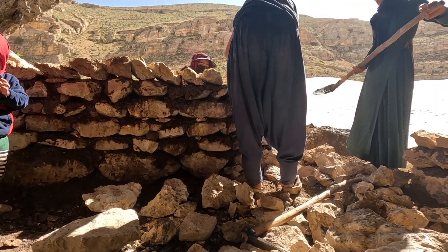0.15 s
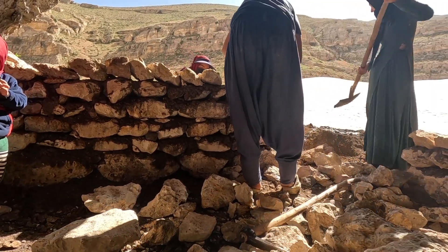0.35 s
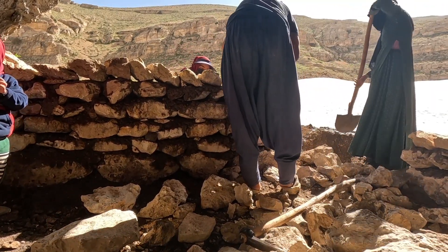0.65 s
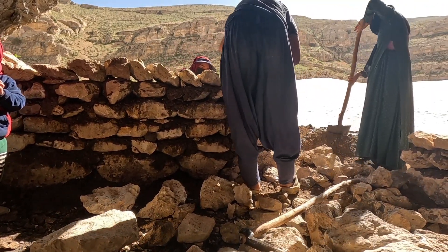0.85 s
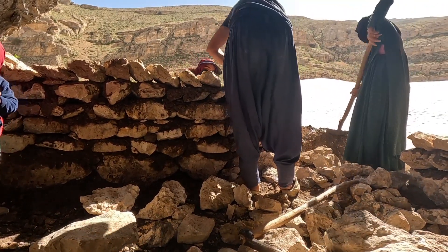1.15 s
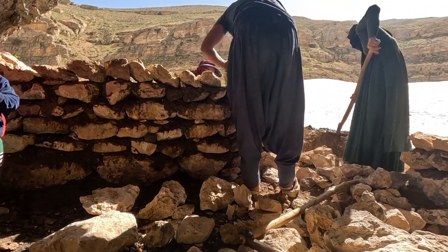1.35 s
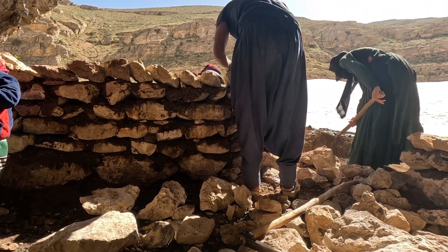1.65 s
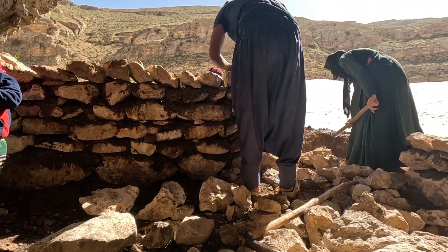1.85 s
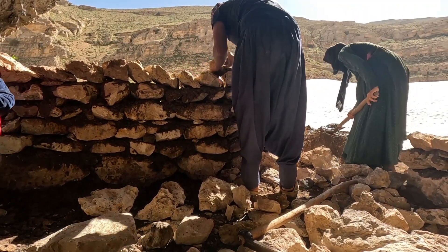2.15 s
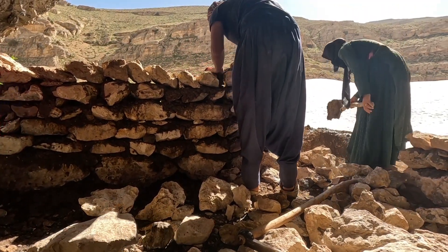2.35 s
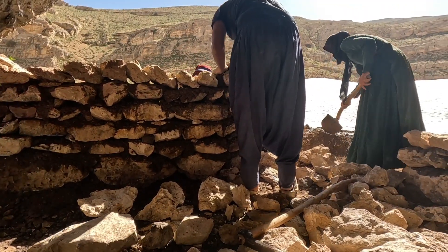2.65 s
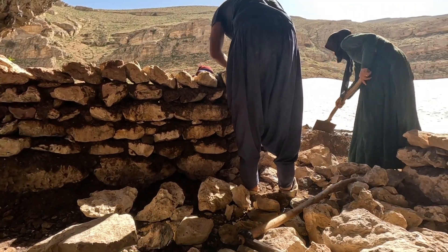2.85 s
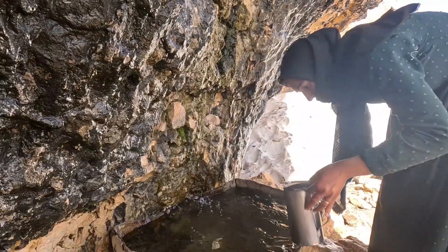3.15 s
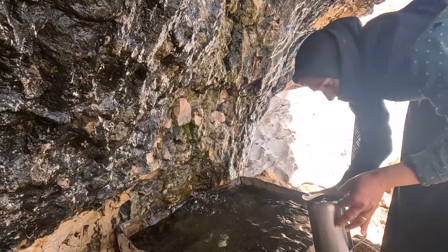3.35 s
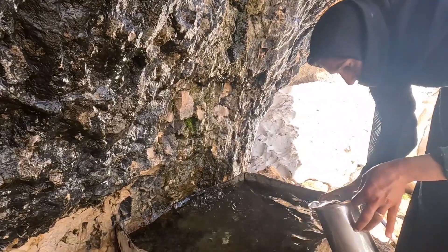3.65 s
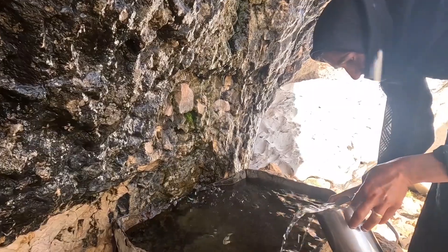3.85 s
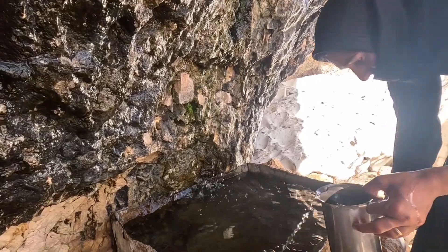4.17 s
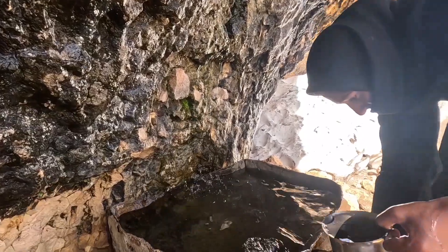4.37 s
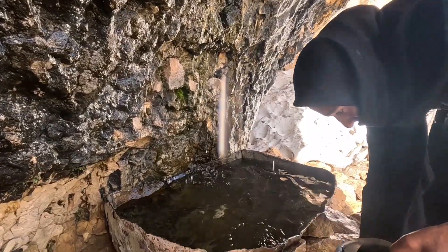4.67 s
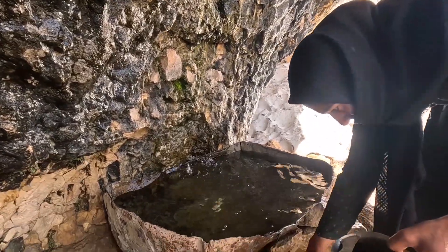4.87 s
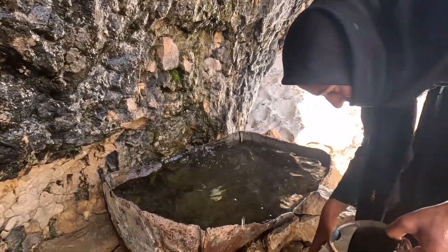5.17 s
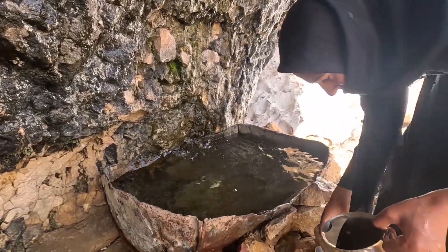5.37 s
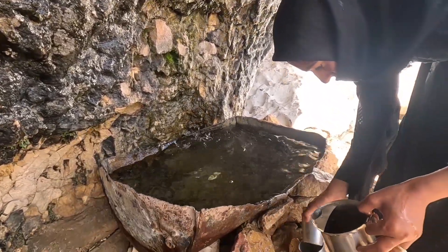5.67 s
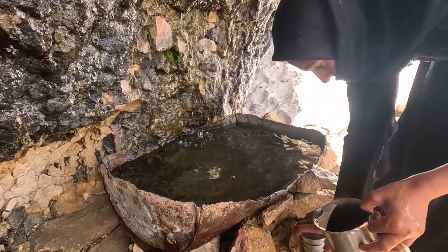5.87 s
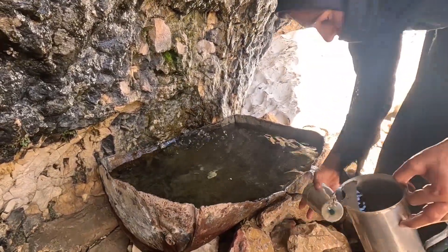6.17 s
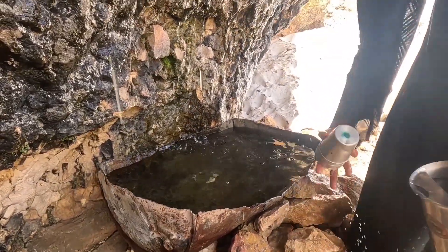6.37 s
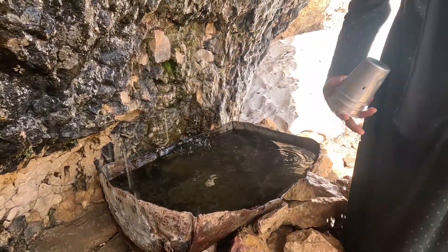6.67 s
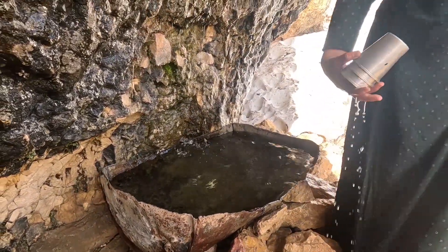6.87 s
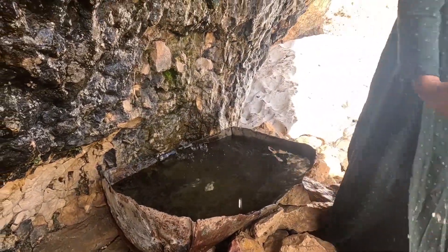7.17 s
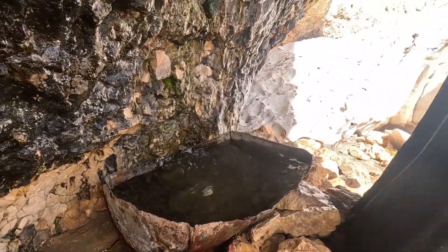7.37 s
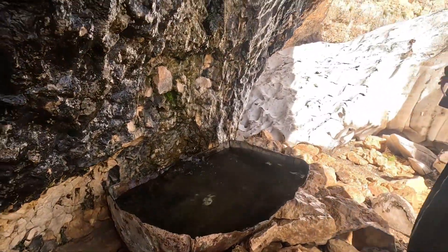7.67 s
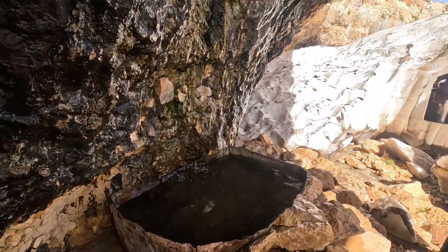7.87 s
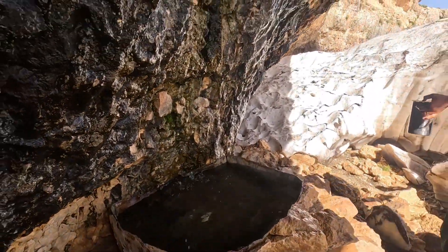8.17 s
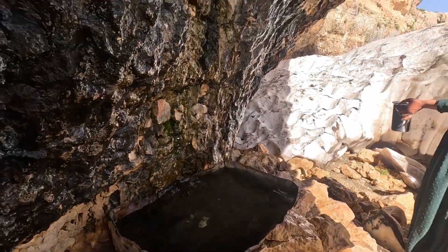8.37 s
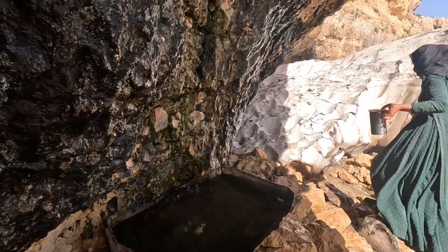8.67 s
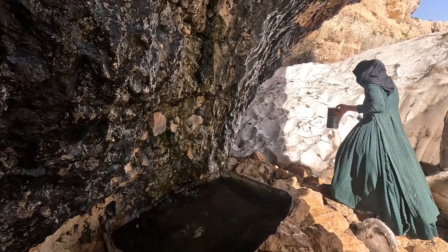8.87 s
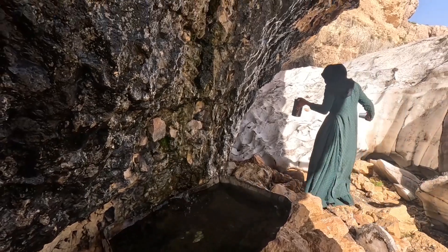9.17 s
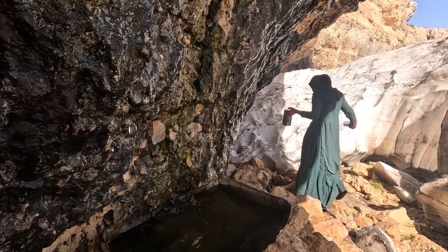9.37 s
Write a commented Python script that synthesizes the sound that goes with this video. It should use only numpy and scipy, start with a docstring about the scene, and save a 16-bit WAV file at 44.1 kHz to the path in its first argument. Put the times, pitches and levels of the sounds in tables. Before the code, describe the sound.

Outdoor handheld sound in two parts. First, gritty shovel bites, a short scrape and boomy loose soil over faint rustle and wind puffs, ending in two loud crunches. Then a sudden change to close, crisp water pouring and dribbling into a full trough, with bubbles. Metal vessels knock, rasp and clink in the middle, with short dull rings; afterwards only trickle, sharp splats and rising bubble blips remain, with close stone reflections.

```python
"""Shovel on a hillside, then water and steel in a rock nook

First a dry hillside: a shovel scrapes and crunches in stony soil (filtered noise under level curves)
while a breeze buffets the microphone (low resonances driven by lumpy noise).
Then a rock nook: melt water dribbles into a tin trough (shaped noise), splats on the rim (decaying pings)
and traps bubbles (gliding sines), while a steel jug is set down on stone and a steel cup clinks
against it (rattles exciting damped modes)."""
import sys
import numpy as np
from scipy import signal
from scipy.fft import rfft, irfft, next_fast_len
from scipy.io import wavfile
from scipy.ndimage import uniform_filter1d, map_coordinates

SR = 44100
rng = np.random.default_rng(int(sys.argv[2]) if len(sys.argv) > 2 else 0)


def log_audio(samples):
    """Write samples as a 16-bit WAV file to the path given in sys.argv[1]."""
    # one column per channel
    frames = np.atleast_2d(samples).T
    # limit to full scale, then quantise
    limited = np.clip(frames, -1, 1)
    pcm = np.round(limited * 32767).astype(np.int16)
    wavfile.write(sys.argv[1], SR, pcm)


N = 420273

# flow of the melt water: (time [s], trickle level [dB], gurgle level [dB])
FLOW = [(2.96, -51, -47.5), (4.2, -46, -38), (4.8, -49.5, -38.5), (5.8, -49, -34), (6.4, -49.5, -36.5),
        (6.6, -54.5, -74), (7.0, -49.5, -42), (9.53, -50.5, -46)]
NOOK_START_S = FLOW[0][0]  # the hillside ends and the water begins


def amp(db):
    """Level definition: decibels to an amplitude gain."""
    return 10 ** (np.asarray(db) / 20)


def unit(x):
    """Power normalisation: scales to rms 1."""
    return x / np.sqrt(np.mean(x ** 2) + 1e-20)


def peak(rows):
    """Peak normalisation: scales each row to a largest magnitude of 1."""
    return rows / abs(rows).max(axis=-1, keepdims=True)


def along(points, hz):
    """Interpolates (frequency [Hz], value) points on a logarithmic frequency axis."""
    f, v = np.transpose(points)
    return np.interp(np.log(hz + 1), np.log(f + 1), v)


def curves(rows):
    """Level envelopes: each column after the time, per sample; -150 dB outside the table."""
    s, *cols = np.transpose(rows)
    return [np.interp(np.arange(N) / SR, s, c, -150, -150) for c in cols]


def wobble(rate):
    """Slow random modulation: a spline through normal random knots, rate of them a second."""
    knots = rng.standard_normal(int(N * rate / SR) + 4)
    return map_coordinates(knots, [np.arange(N) * rate / SR])


def patchy(depth_db):
    """Non-stationary noise: random louder and softer patches in time and frequency."""
    z = signal.stft(rng.standard_normal(N), nperseg=256)[2]
    field = rng.standard_normal(z.shape)
    field = uniform_filter1d(field, size=8, axis=0)
    field = uniform_filter1d(field, size=6, axis=1)
    return signal.istft(z * amp(depth_db * unit(field)), nperseg=256)[1][:N]


def filtered(x, response):
    """Linear filtering: the spectrum of x times a complex response of frequency."""
    m = next_fast_len(N + SR // 2)
    return irfft(rfft(x, m) * response(np.fft.rfftfreq(m, 1 / SR)), m)[..., :N]


def modes(table):
    """Resonance: a sum of causal second-order band-passes (centre [Hz], width [Hz], level [dB])."""
    def response(f):
        total = 0
        for k, (centre, width, db) in enumerate(table):
            damping = 1j * f * width
            # neighbours alternate in sign
            total = total + (-1) ** k * amp(db) * damping / (centre * centre - f * f + damping)
        return total
    return response


def place(s, rows):
    """Superposition: sums rows of samples, each starting at its time s."""
    start = np.round(np.asarray(s) * SR).astype(int)[:, None]
    at = start + np.arange(rows.shape[1])
    return np.bincount(at.ravel(), rows.ravel(), N + SR)[:N]


def rocks(x, t60=0.029):
    """Early reflections: convolution with a short decaying noise tail, echoes off nearby stone."""
    t = np.arange(SR // 8) / SR
    tail = amp(-60 * t / t60) * rng.standard_normal(len(t)) * (t > .002)
    return signal.fftconvolve(x, tail / np.linalg.norm(tail))[:N]


def breeze():
    """Wind buffeting: lumpy noise drives low resonances in puffs, with a higher boom in the nook."""
    # puffs on the microphone: (middle [s], full width at half amplitude [s], level [dB])
    puffs = [(0.47, 0.099, -43), (1.3, 0.62, -48.5), (2.643, 0.051, -45), (2.994, 0.11, -59.5),
             (4.377, 0.24, -51.5), (5.995, 0.24, -56), (7.927, 0.095, -51), (8.082, 0.072, -48.5)]
    calm_db = -73  # buffeting between puffs
    t = np.arange(N) / SR
    strength = amp(calm_db)
    for middle, length, db in puffs:
        strength = strength + amp(db) / (1 + (2 * (t - middle) / length) ** 4)
    lumps = unit(amp(7 * wobble(11)) * rng.standard_normal(N))
    rumble = unit(filtered(lumps, modes([(24.7, 14.0, 3.0), (63.0, 10, -1)])))
    boom = unit(filtered(lumps, modes([(62.0, 3.4, -2.0), (164.0, 36, -4)])))
    return strength * (rumble + amp(5.0) * boom * (t > NOOK_START_S))


def trickle():
    """Broadband flow noise: the fine, unresolved fizz of the stream, coming in surges."""
    # fizz spectrum: (frequency [Hz], spectral density [dB])
    spectrum = [(65, -82), (110, -24), (166, 0), (750, -5.5), (1200, 2.5), (2510, 8), (7670, -1),
                (13400, -22.5)]
    fizz = unit(filtered(patchy(depth_db=5.5), lambda hz: amp(along(spectrum, hz))))
    return amp(curves(FLOW)[0] + 2.5 * wobble(16)) * fizz


def shovel():
    """Granular friction: grit rubs in clumps, a crunch loads it briefly, and loose soil booms."""
    # one long drag of the blade: (time [s], grit level [dB], hollow soil level [dB])
    scrape = [(1.39, -57.5, -75), (1.46, -43, -51), (1.58, -56.5, -48.5), (1.94, -58, -42),
              (2.05, -83, -62), (2.2, -101, -59), (2.4, -66, -84)]
    # blade and stones crunch: (time [s], grit level [dB], soil boom level [dB], length [s])
    crunches = [(0.048, -50.5, -58, 0.022), (0.113, -43.5, -56, 0.034), (0.301, -45.5, -51, 0.014),
                (0.381, -48, -84, 0.0085), (0.839, -43, -88, 0.047), (1.096, -53.5, -64, 0.027),
                (1.425, -51, -65, 0.021), (1.504, -44, -47, 0.029), (1.705, -80, -43, 0.011),
                (1.776, -70, -39, 0.025), (1.901, -55, -43, 0.045), (2.516, -53, -57, 0.02),
                (2.606, -31.5, -38.5, 0.038), (2.909, -26.5, -38, 0.039)]
    # grit spectrum: (frequency [Hz], spectral density [dB])
    grit_spectrum = [(300, -13), (800, -13.5), (1100, -6.5), (2200, -5.5), (7300, -13), (9000, -23),
                     (15500, -47)]
    # soil resonances: (centre [Hz], width [Hz], level [dB]), passed twice
    soil_modes = [(156.6, 52, -1.5), (340, 150, 1.5), (1300, 1530, -5.5)]
    hillside_db = -59.5  # far rustle of grit between strokes
    bite_s = 0.0015  # rise of a crunch

    grit_db, soil_db = curves(scrape)
    s, crunch_db, boom_db, length = np.transpose(crunches)
    t = np.arange(SR // 8) / SR
    shape = (1 - np.exp(-t / bite_s)) / (1 + (t / length[:, None]) ** 5)
    crunch = place(s, amp(crunch_db)[:, None] * shape)
    boom = place(s, amp(boom_db)[:, None] * shape)

    clumps = unit(amp(1.3 * wobble(70)) * patchy(depth_db=3.0))
    grit = unit(filtered(clumps, lambda hz: amp(along(grit_spectrum, hz))))
    soil = unit(filtered(rng.standard_normal(N), lambda hz: modes(soil_modes)(hz) ** 2))
    hump = unit(filtered(patchy(depth_db=0.5), lambda hz: modes([(1300, 800, 0)])(hz) ** 2))

    lurch = wobble(16.14)  # the blade judders
    rustle = amp(hillside_db + 2.5 * wobble(12)) * (np.arange(N) / SR < NOOK_START_S)
    grit_gain = rustle + amp(grit_db + 2.4 * lurch) + crunch
    soil_gain = amp(-15.0) * rustle + amp(soil_db + 3.7 * lurch + 3.2 * wobble(30.35)) + boom
    # the hump makes the rustle fuller around 1300 Hz
    return grit * grit_gain + soil * soil_gain + amp(-7) * rustle * hump


def chirps(s, life, first_hz, last_hz, db):
    """Bubble resonance: a swelling, fading sine whose pitch glides as the cavity nears the surface."""
    t = np.arange(SR // 16) / SR
    u = np.clip(t / life[:, None], 0, 1)  # fraction of life spent
    hz = first_hz[:, None] + (last_hz - first_hz)[:, None] * u ** 1.316
    tone = np.sin(2 * np.pi * np.cumsum(hz, axis=1) / SR)
    return place(s, amp(db)[:, None] * np.sin(np.pi * u) ** 0.5 * tone)


def bursts(s, db, hz, cycles, size=4):
    """Impact sound: a decaying ping, size - 1 later pings near its pitch, and a noise spray."""
    t = np.arange(SR // 25) / SR
    chance = rng.standard_normal((len(s), size, 2, 1))
    turn = np.arange(size)[:, None]  # 0 is the first ping
    pitch = hz[:, None, None] * np.exp(0.3 * chance[:, :, 0] * (turn > 0))
    pitch = np.clip(pitch, 500, 11000)
    late = np.maximum(t - 0.0014 * abs(chance[:, :, 1]) * turn, 0)
    decay = amp(-1.5 * turn - 60 * late * pitch / cycles)  # 60 dB in the given cycles
    pings = np.sum(decay * np.sin(2 * np.pi * pitch * late), axis=1)
    spray = .5 * amp(-60 * t / 0.027) * rng.standard_normal((len(s), len(t)))
    return place(s, amp(db)[:, None] * peak(pings + spray))


def water(splat_rate=220, bubble_rate=22):
    """Impact and bubble sound: clear bursts and chirps over a crowd of small ones (rates per second)."""
    # clear bubbles: (time [s], first pitch [Hz], last pitch [Hz], level before flutter [dB])
    clear_bubbles = [(2.999, 447, 626, -40.5), (3.078, 390, 710, -33), (3.117, 473, 1030, -31),
                     (3.169, 370, 924, -31), (3.347, 595, 677, -31.5), (4.004, 664, 810, -34.5),
                     (4.307, 1300, 1980, -30.5), (5.068, 417, 432, -30.5), (5.514, 588, 840, -35),
                     (6.448, 980, 1910, -34.5), (7.032, 340, 386, -37.5), (7.068, 600, 800, -41),
                     (7.493, 520, 620, -40), (7.583, 540, 614, -35), (7.621, 395, 530, -31),
                     (7.66, 635, 1300, -36), (7.742, 980, 1040, -41), (7.768, 865, 1720, -37.5),
                     (7.898, 480, 1110, -37.5), (8.057, 520, 1080, -37), (8.107, 980, 1750, -37),
                     (8.135, 520, 810, -29.5), (8.784, 592, 577, -33), (8.827, 710, 1378, -34),
                     (9.003, 507, 1345, -42), (9.113, 1210, 1490, -37.5), (9.236, 610, 1330, -41),
                     (9.297, 413, 1050, -35.5), (9.394, 555, 690, -32), (9.422, 666, 810, -37.5)]
    # short bursts: drops on water and tin, the one at 4.405 s probably a jug clink:
    # (time [s], peak level [dB], centre pitch [Hz])
    clear_bursts = [(3.2445, -26, 3680), (3.361, -26.5, 1724), (3.616, -25, 2470), (3.8203, -29, 3900),
                    (3.921, -23, 1740), (4.011, -22.5, 4430), (4.405, -25.5, 3140), (4.73, -31, 3080),
                    (5.588, -27.5, 5340), (6.1261, -28.5, 7540), (6.1966, -24, 1787), (6.3834, -27, 4500),
                    (6.408, -23, 9600), (6.4944, -28.5, 3360), (6.613, -18, 5620), (6.817, -26.5, 4630),
                    (6.8892, -21, 4180), (6.9398, -29, 5680), (7.1443, -27.5, 5690), (7.2656, -26.5, 3170),
                    (7.493, -25.5, 4000), (7.659, -22.5, 3920), (8.1925, -26.5, 2880), (8.543, -24.5, 5600),
                    (8.59, -19.5, 3300), (8.658, -28.5, 1840), (9.33, -24.5, 2965), (9.481, -29, 4800)]
    bubble_cycles = 19.5  # a clear bubble lives this many cycles of its last pitch
    patter_db = 2  # peak of the smallest drops over the trickle

    churn = amp(4.5 * wobble(220))  # the ruffled surface makes bubbles flutter
    s, db, hz = np.transpose(clear_bursts)
    loud = bursts(s, db, hz, cycles=71)
    start, low_hz, high_hz, bubble_db = np.transpose(clear_bubbles)
    bubbles = chirps(start, bubble_cycles / high_hz, low_hz, high_hz, bubble_db)

    span = N / SR - NOOK_START_S
    when, trickle_db, gurgle_db = np.transpose(FLOW)
    small = rng.random((int(splat_rate * span), 3))
    at = NOOK_START_S + span * small[:, 0]
    flow_db = np.interp(at, when, trickle_db)
    size_db = np.minimum(-6 * np.log(small[:, 1]), 15)  # many small drops, few big ones
    small_hz = 1100 * 7 ** small[:, 2]
    patter = bursts(at, flow_db + patter_db + size_db, small_hz, cycles=36.8, size=2)

    tiny = rng.random((int(bubble_rate * span), 5))
    born = NOOK_START_S + span * tiny[:, 0]
    first_hz = 380 * 2.2 ** tiny[:, 1]
    life = (7 + 9 * tiny[:, 2]) / first_hz
    last_hz = first_hz * (1 + tiny[:, 3])
    tiny_db = np.interp(born, when, gurgle_db) - 14 * tiny[:, 4]
    gurgle = chirps(born, life, first_hz, last_hz, tiny_db)
    return loud + churn * (bubbles + gurgle) + amp(2.5 * wobble(15)) * patter


def vessel(hits, table, sag_hz_per_s, detune):
    """Modal synthesis: a tap and dying rattle excite an air cavity and the wall modes near best_hz."""
    t = np.arange(SR // 6) / SR
    hz, ring_t60 = np.transpose(table)[:, :, None]
    cavity = hz == hz[0]
    spread = np.where(cavity, .04, detune)  # each hit's modes shift at random by this small spread
    rows = []
    for s, db, ring_db, rasp_db, t60, best_hz in hits:
        uneven = amp(2.5 * rng.standard_normal(len(t) // 128 + 1)).repeat(128)[:len(t)]
        rattle = np.minimum(t / 0.001, 1) * amp(-60 * t / t60) * uneven * rng.standard_normal(len(t))
        rasp = peak(uniform_filter1d(rattle, size=6))  # grating steel
        rattle[0] += 12  # the tap itself

        # modes a quarter octave or more from best_hz are 17 dB weaker on average
        distance = np.minimum(abs(np.log2(hz / best_hz)) * 4, 1)
        spot_db = -17 * distance + rng.normal(0, 3, hz.shape)
        sagged = hz - cavity * sag_hz_per_s * (s - hits[0][0])
        shifted = sagged * np.exp(rng.normal(0, 1, hz.shape) * spread)
        ring = amp(spot_db - 60 * t / ring_t60) * np.sin(2 * np.pi * shifted * t)

        short_rattle = rattle * amp(-25 * t / t60)
        knock = peak(signal.fftconvolve(short_rattle, ring[0])[:len(t)])
        walls = peak(signal.fftconvolve(rattle, ring[1:].sum(axis=0))[:len(t)])
        rows.append(amp(db) * knock + amp(ring_db) * walls + amp(rasp_db) * rasp)
    return place(np.transpose(hits)[0], np.array(rows))


def cup():
    """Struck shell: a steel cup clinks against the jug and rings in its wall modes."""
    # contacts: (time [s], hollow knock peak [dB], wall ring peak [dB], rasp peak [dB],
    #            rattle t60 [s], best-excited wall mode [Hz])
    hits = [(5.022, -17, -33.5, -27, 0.12, 3025), (5.0765, -44, -25, -22, 0.058, 4380),
            (5.117, -15, -21, -34, 0.14, 3020), (5.147, -19, -22, -47, 0.049, 3020),
            (5.2237, -19.5, -36, -40, 0.018, 3020), (5.287, -14.5, -29, -32, 0.12, 3020),
            (5.359, -8.5, -24, -17.5, 0.0083, 3020), (5.392, -23, -40.5, -24.5, 0.16, 7230),
            (5.6377, -10.5, -31.5, -32, 0.051, 3750), (5.726, -29, -25, -16, 0.053, 6970),
            (5.749, -20, -26, -18, 0.057, 4160), (5.77, -13.5, -30.5, -27.5, 0.11, 3020),
            (5.886, -27, -37, -23.5, 0.099, 4380), (5.916, -22, -32.5, -22, 0.048, 7230)]
    # air cavity, then wall modes: (frequency [Hz], t60 [s])
    resonances = [(980, 0.011), (3025, 0.07), (3750, 0.06), (4380, 0.045), (5900, 0.03), (6470, 0.04),
                  (7230, 0.035)]
    return vessel(hits, resonances, sag_hz_per_s=0, detune=.004)


def jug():
    """Struck shell and air cavity: a steel jug set down on stone, its cavity note sinking as it is tipped."""
    # contacts: (time [s], hollow knock peak [dB], wall ring peak [dB], rasp peak [dB],
    #            rattle t60 [s], best-excited wall mode [Hz])
    hits = [(4.426, -9.5, -23, -49, 0.17, 2150), (4.464, -20, -25, -17, 0.052, 2750),
            (4.485, -22, -27.5, -32, 0.079, 7640), (4.51, -15, -24.5, -26, 0.15, 2300),
            (4.526, -10.5, -19, -24, 0.092, 4310), (4.606, -14.5, -27, -22.5, 0.08, 3580),
            (4.661, -19, -31.5, -31, 0.19, 2500)]
    # air cavity, then wall modes: (frequency [Hz], t60 [s])
    resonances = [(790, 0.012), (2130, 0.044), (2750, 0.023), (3580, 0.0099), (4300, 0.018), (5960, 0.047),
                  (7640, 0.024)]
    return vessel(hits, resonances, sag_hz_per_s=650, detune=.02)


def scene():
    """Mid-side stereo: two close microphone ports whose difference grows with pitch and drifts at random."""
    # microphone colour on sharp sounds: (frequency [Hz], gain [dB])
    colour = [(100, -9), (7400, 9), (8300, 4.5), (11000, -4.5), (15500, -30)]
    # left-right likeness setting the side share: (frequency [Hz], likeness [0 to 1])
    alike = [(300, 0.8), (6000, 0.63), (12000, 0.43)]

    def sharp_response(hz):
        return amp(along(colour, hz)) * hz ** 2 / (hz ** 2 + 300 ** 2)

    def share(hz):
        return np.tan(np.arccos(np.clip(along(alike, hz), 0, 1)) / 2)

    sharp = water() + jug() + cup()
    sharp = filtered(sharp + amp(-8.0) * rocks(sharp), sharp_response)
    mid = sharp + trickle() + shovel() + breeze()
    side = filtered(0.78 * rocks(mid, t60=0.063) + 0.33 * wobble(40) * mid, share)
    side += filtered(mid, lambda hz: 0.28 / (1 + (7500 / (hz + 1)) ** 8))  # the left port is brighter
    return np.array([mid + side, mid - side])


def record(dry):
    """Band limitation: nothing passes at or above 15750 Hz."""
    return filtered(dry, lambda hz: hz < 15750)


dry = scene()
out = record(dry)
log_audio(out)
```